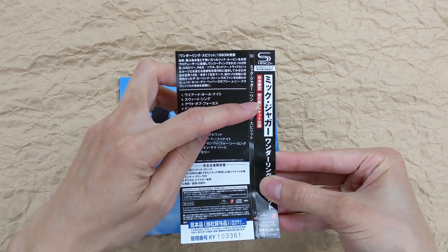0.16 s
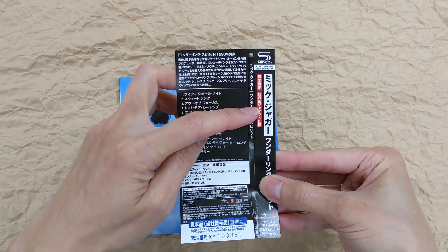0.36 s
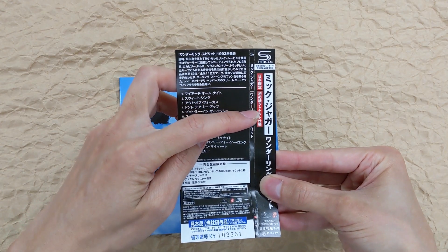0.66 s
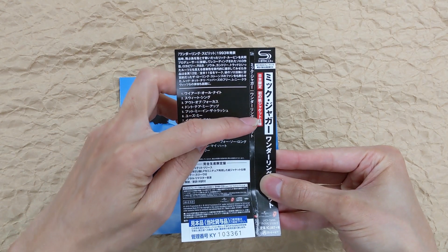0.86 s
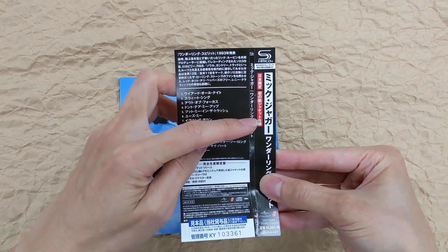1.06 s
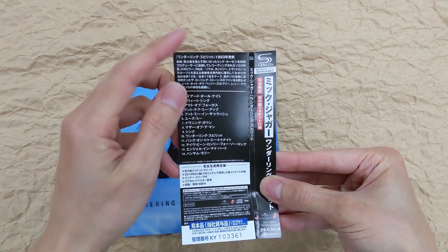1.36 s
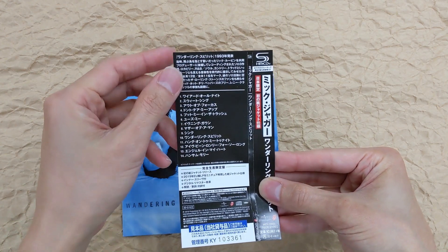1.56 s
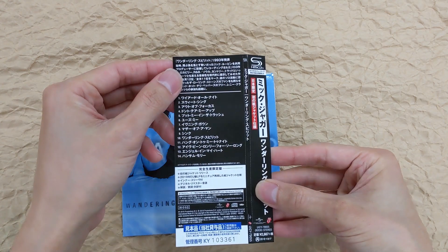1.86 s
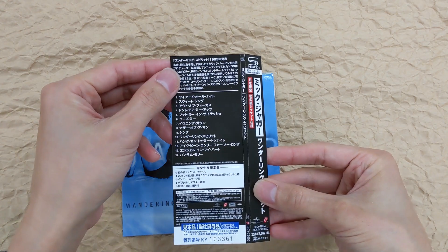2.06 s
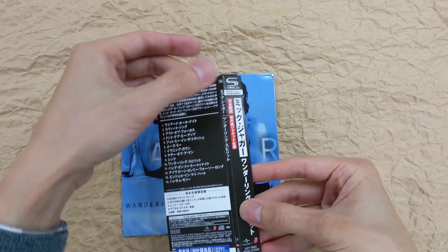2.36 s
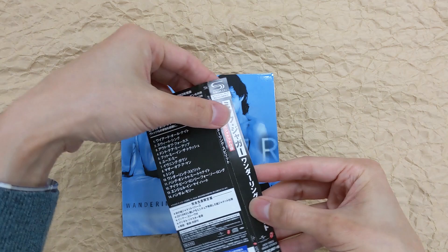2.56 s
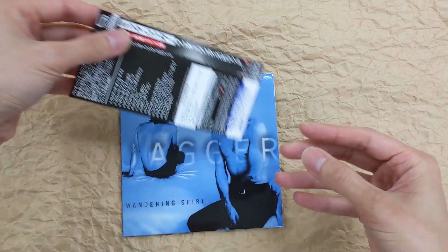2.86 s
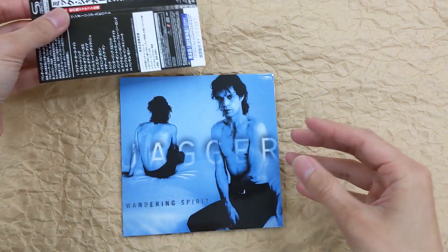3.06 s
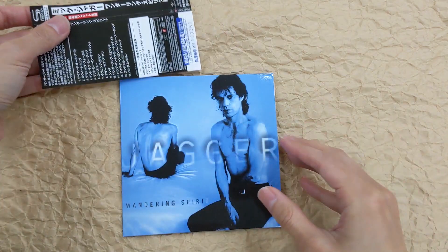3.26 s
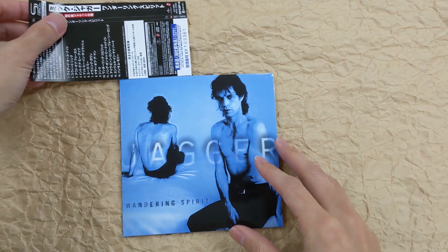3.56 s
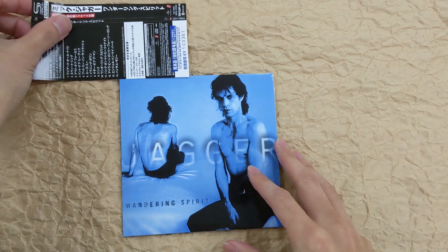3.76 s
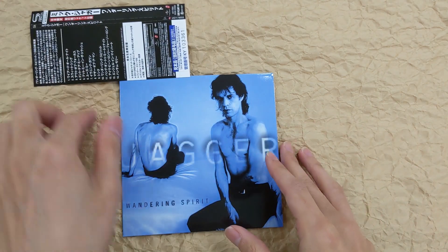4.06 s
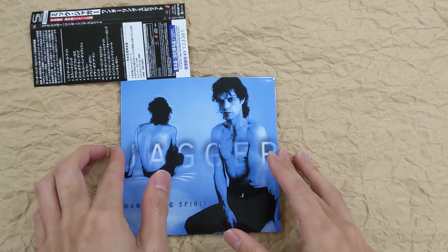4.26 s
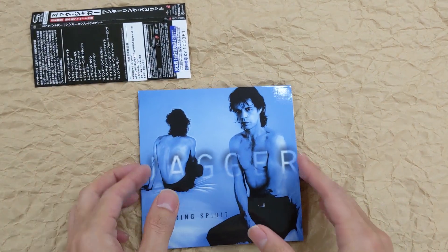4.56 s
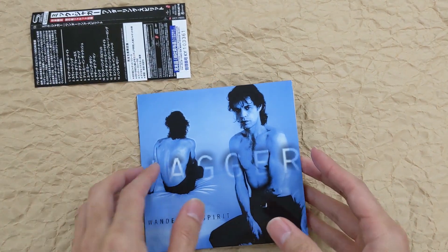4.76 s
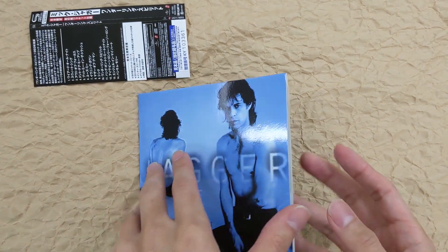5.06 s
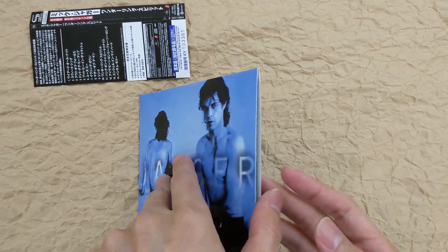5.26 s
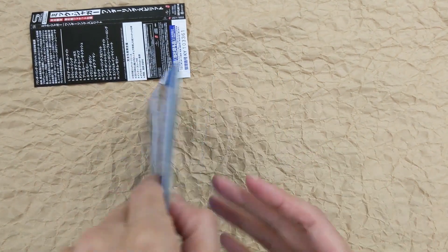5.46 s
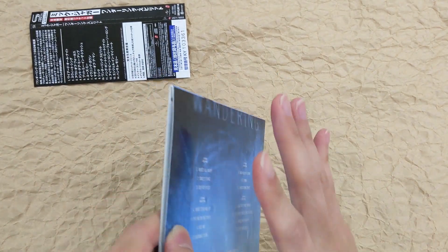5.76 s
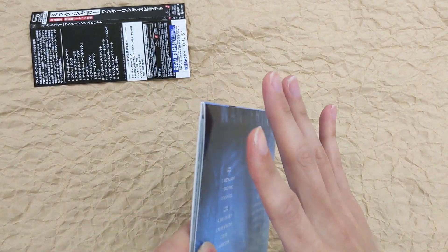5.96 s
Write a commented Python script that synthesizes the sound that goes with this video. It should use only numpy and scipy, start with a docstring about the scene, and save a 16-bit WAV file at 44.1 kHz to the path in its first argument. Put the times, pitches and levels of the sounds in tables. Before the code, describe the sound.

A low ventilation hum runs steadily in a small room while hands work close by. Faint paper rubbing leads to two sharp snaps of a stiff strip and a softer third. The strip scrapes off a cardboard disc sleeve, ending in a flick and a crack. Then come a brush over the table cover, light taps, a short drag of the sleeve and soft fingertip swishes on its smooth surface.

```python
"""A small room with a low ventilation hum, heard close to the hands at work.
They slide a folded paper strip off a cardboard disc sleeve, lay it down, then drag and lift the
sleeve over a crinkled table cover. Stick-slip friction of fingers, paper and card drives the damped
modes of the sheets; impulses make them tick, and the stiff strip snaps twice, then once more softly."""
import sys
import numpy as np
from scipy import signal
from scipy.fft import rfft, irfft
from scipy.io import wavfile

SR = 44100
rng = np.random.default_rng(int(sys.argv[2]) if len(sys.argv) > 2 else 0)


def put_to_file(sound):
    """Save the sound as 16-bit audio at rate SR, in the file named by the first command-line argument."""
    columns = np.atleast_2d(sound).T  # one column per channel
    safe = np.clip(columns, -1, 1)
    whole_steps = np.round(safe * 32767)
    wavfile.write(sys.argv[1], SR, whole_steps.astype(np.int16))


N = 270333
TIME = np.arange(N) / SR
HZ = np.fft.rfftfreq(N, 1 / SR)

# spectra of the room air and the duct rumble: (frequency [Hz], relative level [dB])
AIR_SPECTRUM = [(53, -34.5), (90, -3), (149, -1.5), (170, -6), (258, -15), (361, -20), (479, -19.5),
                (1070, -23.5), (1250, -24), (2150, -24.5), (5710, -28.5), (7420, -36), (8000, -42),
                (10400, -74), (17600, -120)]
RUMBLE_SPECTRUM = [(10, -23.5), (22, -12), (30, 7), (38, -1.5), (50, 4.5), (85, 0.5), (110, -10.5),
                   (170, -17.5), (260, -15.5), (500, -39.5)]
# hum bands, deepest first: (frequency [Hz], bandwidth [Hz], level [dB])
HUM_BANDS = [(58.77, 7.3, -50), (107.8, 6, -66.5), (140.5, 2.9, -66), (195.8, 8.7, -63.5), (313, 34, -84)]
# shape of the deepest band's wavering: (time [s], level [arbitrary units])
HUM_CONTOUR = [(0.0, -56.5), (0.22, -47.5), (0.82, -47.5), (0.97, -51.5), (3.02, -48), (3.12, -57.5),
               (3.53, -45), (3.58, -52), (4.23, -52), (4.25, -53), (5.33, -47), (5.36, -66.5), (5.41, -49),
               (5.63, -43.5), (5.68, -49.5), (6.13, -48)]
# reflections from nearby surfaces: (delay [s], level [dB])
ECHOES = [(.0062, -22), (.0084, -25.5), (0.0085, -30), (0.0207, -27), (.0245, -30), (0.028, -27)]
# colour of the reverberant tail: (frequency [Hz], relative level [dB])
TAIL_SPECTRUM = [(200, -3.5), (1100, 4.5), (2200, 19), (3200, -3.5), (5000, -12.5), (8000, -17.5)]
# decay of the tail: (frequency [Hz], reverberation time [s])
ROOM_T60 = [(150, 0.28), (1000, 0.31), (2200, 0.098), (3200, 0.75), (8000, 0.053)]

# friction spectra of table cover, smooth print and strip edge: (frequency [Hz], relative level [dB])
COVER_SPECTRUM = [(130, -24), (220, -5.5), (264, -6), (340, 5.5), (526, -9.5), (990, -9.5), (1050, -26),
                  (1130, -11.5), (1550, -12.5), (1920, -23.5), (3550, -10), (5580, -9), (6290, -8),
                  (7420, -13.5), (8000, -20), (10400, -35), (17600, -120)]
PRINT_SPECTRUM = [(150, -11.5), (300, 0), (600, -11), (900, -2.5), (1500, -5), (2100, -4), (2700, 0),
                  (4000, 2), (4900, 2), (5600, -1), (7300, -3), (8200, -9)]
EDGE_SPECTRUM = [(290, -36), (500, -12), (542, -19), (725, -14), (1110, -30.5), (1810, -7), (4330, 5),
                 (7290, -2), (8000, -5.5), (10400, -29), (17600, -120)]
# modes of sleeve, slipping strip and strip: (frequency [Hz], bandwidth [Hz], relative level [dB])
SLEEVE_MODES = [(290, 69, 6.5), (467, 190, 2), (850, 180, -4.5), (1250, 890, -3), (1440, 130, -4.5),
                (2220, 490, -11), (2730, 800, -6), (3290, 490, -25.5), (4390, 1100, -8), (6160, 910, -9)]
SLIP_MODES = [(506, 91, -2), (1100, 500, 0.5), (1580, 360, -6), (2700, 900, -29), (3680, 490, -3),
              (4500, 700, -20), (5830, 580, -8)]
STRIP_MODES = [(200, 90, -27), (382, 88, -4), (553, 120, -10), (848, 94, -2.5), (1134, 260, -1.5),
               (1374, 110, -3), (1916, 66, -4), (2260, 360, -17), (2850, 510, -15), (3254, 170, -6.5),
               (3680, 690, -12), (4750, 570, -25.5), (5330, 680, -19), (6100, 720, -17), (7240, 1200, -33)]

# rubbing strokes: (start [s], rise [s], length [s], body level [dB], hiss level [dB])
COVER_BRUSHES = [(3.878, 0.012, 0.012, -42, -45), (3.895, 0.014, 0.053, -52, -55.5),
                 (3.93, 0.072, 0.11, -60.5, -49.5), (4.07, .06, .13, -65, -54.5),
                 (4.18, 0.035, 0.19, -52.5, -54)]  # hands on the table cover
PRINT_SWISHES = [(.93, 0.074, 0.11, -53, -46), (4.7, .15, 0.2, -61.5, -60), (4.98, 0.071, 0.248, -63, -61),
                 (5.22, 0.047, 0.079, -55, -50.5)]  # fingertips on smooth print
SLEEVE_DRAGS = [(4.468, 0.024, 0.064, -40.5, -46.5), (4.52, 0.086, .09, -52.5, -45),
                (4.645, 0.029, 0.027, -58, -46)]  # the sleeve pulled towards the table's edge
STRIP_RUBS = [(0, .02, 0.26, -63, -65), (.44, 0.045, .26, -61.5, -66.5),
              (1.21, 0.0028, 0.075, -50.5, -52.5), (2.053, .004, 0.042, -52.5, -53),
              (2.599, 0.0026, 0.02, -51, -44.5)]  # fingers on the strip
STRIP_SLIPS = [(2.1, 0.26, 0.368, -52, -55.5), (2.47, 0.11, 0.13, -58.5, -53)]  # the strip slipping up along the sleeve
# the strip's edge gliding off the sleeve, ending in a flick:
# (start [s], rise [s], length [s], level [dB], ringing share [0-1])
EDGE_GLIDES = [(3.009, 0.066, 0.11, -47.5, 0.4), (3.074, 0.2, 0.31, -50.5, 0.22),
               (3.39, 0.033, 0.085, -55.5, 0.4), (3.425, 0.19, 0.21, -44.5, 0.7),
               (3.632, .023, 0.021, -36, 0.04)]
# light impacts on the sleeve, and at 3.777 s the room's echo of the crack at 3.754 s:
# (time [s], level [dB], low cutoff [Hz], high cutoff [Hz], contact time [s])
SLEEVE_TAPS_AND_ECHO = [(3.015, -46, 150, 452, .007), (3.1003, -40.5, 1500, 2800, 0.0017),
                        (3.1623, -48.5, 2000, 6500, 0.0045), (3.5135, -45, 2760, 6450, 0.0052),
                        (3.6555, -37.5, 2470, 5800, 0.0031), (3.7542, -35.5, 890, 4500, 0.0024),
                        (3.7567, -29.5, 1710, 4800, 0.0045), (3.777, -44.5, 1600, 6000, .004),
                        (3.8915, -35, 260, 940, 0.0016), (4.2987, -40, 1206, 6960, .002),
                        (4.321, -43.5, 400, 7500, 0.0078), (4.532, -44, 330, 800, 0.0025),
                        (5.0335, -45, 500, 7500, 0.0051), (5.050, -46, 4550, 8000, 0.0044)]
# fingers ticking against the strip:
# (time [s], level [dB], low cutoff [Hz], high cutoff [Hz], contact time [s])
STRIP_TICKS = [(1.039, -43.5, 200, 990, 0.0046), (1.2137, -50, 500, 6000, .002),
               (1.245, -44, 300, 880, 0.024), (1.2875, -53, 450, 6050, 0.0017),
               (2.056, -56, 2500, 7900, .004), (2.0932, -39.5, 600, 5000, .005),
               (2.2973, -47, 700, 2000, .005), (2.3425, -36, 300, 3200, 0.0033),
               (2.5053, -44, 344, 1800, 0.0036), (2.6006, -42.5, 785, 8150, 0.004),
               (2.9483, -47, 1800, 7000, 0.0037)]
# the stiff strip snapping: (time [s], crack level [dB], rebound level [dB], flutter level [dB],
# low cutoff [Hz], high cutoff [Hz], flutter high cutoff [Hz], crackle share [0-1])
STRIP_SNAPS = [(1.6047, -23.5, -20, -31, 800, 2400, 2260, 0.09),
               (1.8375, -28, -37.5, -28, 210, 6900, 1056, 0.54),
               (2.4685, -33.5, -38, -34, 420, 1450, 960, 0.9)]


def amp(db):
    """Amplitude grows tenfold for every 20 dB."""
    return 10 ** (np.asarray(db) / 20)


def unit(x):
    """Normalisation to an rms of 1."""
    return x / np.sqrt(np.mean(x ** 2) + 1e-20)


def curve_at(points, hz):
    """Interpolation on a logarithmic frequency axis."""
    frequencies, values = np.transpose(points)
    return np.interp(np.log(hz + 1), np.log(frequencies + 1), values)


def add(mix, time_s, sound):
    """Superposition: a sound adds to the mix from its onset."""
    part = mix[round(time_s * SR):][:len(sound)]
    part += sound[:len(part)]


def shaped(x, response):
    """Linear filtering multiplies a spectrum by a frequency response."""
    return irfft(rfft(x) * response, N)


def noise(response):
    """Filtered white noise takes on the filter's spectrum."""
    return shaped(rng.standard_normal(N), response)


def band(hz, low_hz, high_hz):
    """Band-pass gain, falling 12 dB per octave below the band and 18 above."""
    return (hz / low_hz) ** 2 / np.sqrt((1 + (hz / low_hz) ** 4) * (1 + (hz / high_hz) ** 6))


def ventilation(air_db, rumble_db, waver_db):
    """Broadband air noise and duct rumble lie under narrowband hums, the deepest amplitude-modulated."""
    air = noise(amp(curve_at(AIR_SPECTRUM, HZ)) * HZ ** 2 / (HZ ** 2 + 130 ** 2))
    air *= amp(air_db) / np.std(shaped(air, HZ > 300))  # air_db is the level above 300 Hz
    rumble = amp(rumble_db) * unit(noise(amp(curve_at(RUMBLE_SPECTRUM, HZ))))
    hums = [amp(db) * unit(noise(1 / (1 + (2 * (HZ - hz) / width) ** 2))) for hz, width, db in HUM_BANDS]
    contour = np.interp(TIME, *np.transpose(HUM_CONTOUR))
    waver = amp(waver_db * unit(contour - contour.mean()))
    carrier = np.cos(np.angle(signal.hilbert(hums[0])))
    deepest = np.std(hums[0]) * unit(carrier * waver)
    return air + rumble + deepest + sum(hums[1:])


def room(x, tail_db, build_s, count=900, spacing=22):
    """Reflection: nearby surfaces return discrete echoes, the walls a short diffuse tail."""
    reflections = np.zeros(count * spacing)
    signs = rng.choice([-1, 1], count)
    reflections[np.arange(count) * spacing + rng.integers(0, spacing, count)] = signs
    hz, t, spectra = signal.stft(reflections, SR, nperseg=256)
    decay = amp(curve_at(TAIL_SPECTRUM, hz)[:, None] - 60 * t / curve_at(ROOM_T60, hz)[:, None])
    tail = signal.istft(spectra * decay * (1 - np.exp(-t / build_s)), SR)[1]
    response = amp(tail_db) * tail / np.linalg.norm(tail)
    for delay, db in ECHOES:
        add(response, delay, amp([db]))
    return x + signal.fftconvolve(x, response)[:N]


def modal_gain(modes, hz):
    """A sheet responds as a set of damped oscillators whose powers add."""
    return np.sqrt(sum(amp(2 * db) * (hz * width) ** 2 / ((mode_hz ** 2 - hz ** 2) ** 2 + (hz * width) ** 2)
                       for mode_hz, width, db in modes))


def stroke(start, rise, length, power, release_s):
    """A stroke gathers speed by a power law, holds, and decays exponentially when the hand stops."""
    t = np.maximum(TIME - start, 0)
    return np.minimum(t / rise, 1) ** power * np.exp(-np.clip((t - length) / release_s, 0, 20))


def friction(catches_per_s, grit, judder_db):
    """Stick-slip: fibres catch and let go in clumps, over a smooth hiss."""
    catches = (rng.random(N) < catches_per_s / SR) * rng.standard_normal(N)
    force = rng.standard_normal(N) + grit * unit(catches)
    judder = unit(noise(np.exp(-(HZ / 73) ** 2)))
    return unit(force * amp(judder_db * judder))


def rub(strokes, surface, force, split_hz, power, release_s, lock=1):
    """Forced vibration: pressure works a sheet's low modes; speed brings out the hiss above them."""
    surface = surface ** lock  # above 1, the slipping falls in step with the strongest modes
    low_pass = 1 / (1 + (HZ / split_hz) ** 8)
    body = unit(shaped(force, surface * low_pass))
    hiss = unit(shaped(force, surface * (1 - low_pass)))
    return sum((amp(body_db) * body + amp(hiss_db) * hiss) * stroke(start, rise, length, power, release_s)
               for start, rise, length, body_db, hiss_db in strokes)


def resonate(x, hz, width_hz):
    """A double-pole resonance follows the frequency curve hz."""
    phasor = np.exp(2j * np.pi * np.cumsum(hz) / SR)
    pole = np.exp(-np.pi * width_hz / SR)
    return unit((phasor * signal.lfilter([1], np.poly([pole, pole]), x / phasor)).real)


def edge_glide(start_hz=2130, climb_from_s=3.284, climb_hz_per_s=4100, width_hz=1070):
    """Two resonances climb over the edge's hiss as the overlap of strip and sleeve shrinks."""
    scrape = friction(catches_per_s=640, grit=0.31, judder_db=2.5)
    sweep = friction(catches_per_s=2300, grit=0.62, judder_db=0.5)
    hz = start_hz + climb_hz_per_s * np.clip(TIME - climb_from_s, 0, 0.5)
    ring = unit(resonate(scrape, hz, width_hz) + amp(-8.5) * resonate(scrape, 1.25 * hz, width_hz))
    hiss = unit(shaped(sweep, amp(curve_at(EDGE_SPECTRUM, HZ)) * band(HZ, low_hz=900, high_hz=12000)))
    out = np.zeros(N)
    for start, rise, length, db, share in EDGE_GLIDES:
        envelope = amp(db) * stroke(start, rise, length, power=1.12, release_s=0.011)
        out += envelope * (np.sqrt(share) * ring + np.sqrt(1 - share) * hiss)
    return out


def minimum_phase(gain):
    """A minimum-phase response delivers its energy early, as a struck body does."""
    log_gain = np.log(np.maximum(gain / gain.max(), 1e-4))
    mirrored = np.r_[log_gain, log_gain[-2:0:-1]]
    return np.exp(np.conj(signal.hilbert(mirrored)))[:len(gain)]


def impact(modes, low_hz, high_hz, crackle_share, decay_s, size=4096):
    """An impulse and a dying crackle excite a sheet's modes; the energy equals 5 ms at an rms of 1."""
    t, hz = np.arange(size) / SR, np.fft.rfftfreq(size, 1 / SR)
    crackle = rng.standard_normal(size) * np.exp(-t / decay_s)
    force = np.sqrt(1 - crackle_share) + np.sqrt(crackle_share) * rfft(crackle / np.linalg.norm(crackle))
    sound = irfft(force * minimum_phase(modal_gain(modes, hz) * band(hz, low_hz, high_hz)))
    return sound / np.linalg.norm(sound) * np.sqrt(0.005 * SR)


def taps(contacts, modes, clean_contact_s=0.0039):
    """Contact time sets the excitation: a short touch is one click, a longer one crackles."""
    out = np.zeros(N)
    for time_s, db, low_hz, high_hz, contact_s in contacts:
        crackle_share = 1 - np.exp(-(contact_s / clean_contact_s) ** 2)
        add(out, time_s, amp(db) * impact(modes, low_hz, high_hz, crackle_share, contact_s))
    return out


def strip_snaps(crack_decay_s=0.0033, rebound_delay_s=0.00175, flutter_delay_s=0.00438):
    """Sudden release: the stiff strip cracks and rebounds, then its free flap shakes itself out."""
    out = np.zeros(N)
    for time_s, crack_db, rebound_db, flutter_db, low_hz, high_hz, flutter_hz, share in STRIP_SNAPS:
        for delay, db in (0, crack_db), (rebound_delay_s, rebound_db):
            add(out, time_s + delay, amp(db) * impact(STRIP_MODES, low_hz, high_hz, share, crack_decay_s))
        flutter = impact(STRIP_MODES, low_hz=600, high_hz=flutter_hz, crackle_share=0.42, decay_s=0.0051)
        add(out, time_s + flutter_delay_s, amp(flutter_db) * flutter)
    return out


def scene():
    """Impacts and friction superpose, reverberate in the room, and add to the ventilation."""
    hands = strip_snaps() + taps(STRIP_TICKS, STRIP_MODES) + taps(SLEEVE_TAPS_AND_ECHO, SLEEVE_MODES)
    hands += rub(STRIP_RUBS, modal_gain(STRIP_MODES, HZ),
                 friction(catches_per_s=1700, grit=0.56, judder_db=4.0),
                 split_hz=3300, power=0.77, release_s=0.0092, lock=1.12)
    hands += rub(STRIP_SLIPS, modal_gain(SLIP_MODES, HZ),
                 friction(catches_per_s=1500, grit=0.97, judder_db=1.5),
                 split_hz=4440, power=0.96, release_s=0.014, lock=1.06)
    hands += rub(PRINT_SWISHES, amp(curve_at(PRINT_SPECTRUM, HZ)),
                 friction(catches_per_s=3400, grit=0.88, judder_db=1.0),
                 split_hz=3200, power=0.92, release_s=0.006)
    hands += rub(COVER_BRUSHES, amp(curve_at(COVER_SPECTRUM, HZ)),
                 friction(catches_per_s=650, grit=0.56, judder_db=1.8),
                 split_hz=2400, power=1.0, release_s=0.023)
    hands += rub(SLEEVE_DRAGS, modal_gain(SLEEVE_MODES, HZ) * band(HZ, low_hz=200, high_hz=5600),
                 friction(catches_per_s=680, grit=0.57, judder_db=1.5),
                 split_hz=1170, power=0.82, release_s=0.016, lock=1.43)
    hands += edge_glide()
    in_room = room(hands, tail_db=-25, build_s=0.01)
    return (in_room + ventilation(air_db=-56.5, rumble_db=-51, waver_db=4))[None]


def record(dry):
    """Band limiting: a low-pass filter removes the treble above about 8 kHz."""
    low_pass = signal.firwin(121, 7950, window=("kaiser", 7), fs=SR)
    return signal.oaconvolve(dry, low_pass[None], "same")


dry = scene()
out = record(dry)
put_to_file(out)
```